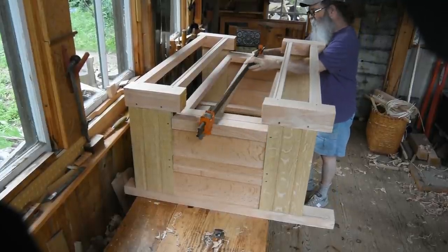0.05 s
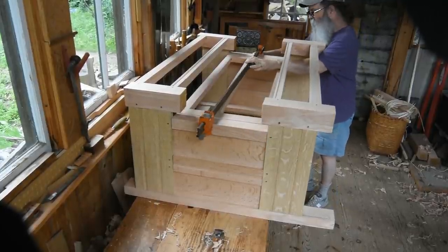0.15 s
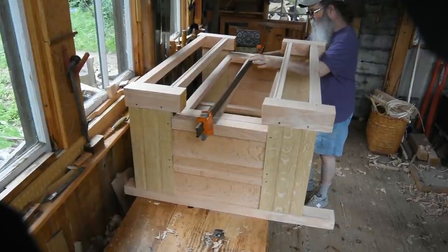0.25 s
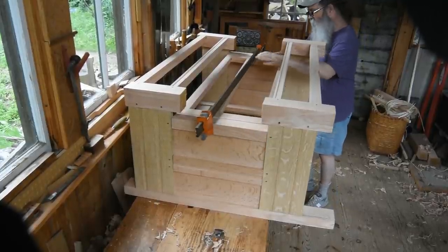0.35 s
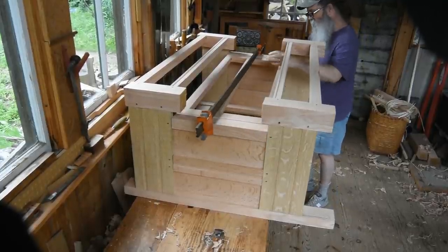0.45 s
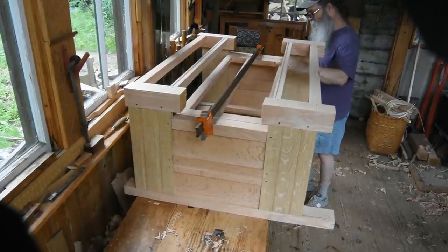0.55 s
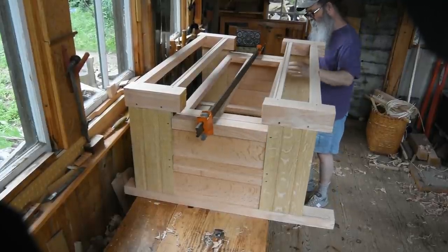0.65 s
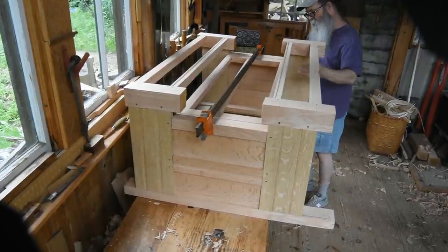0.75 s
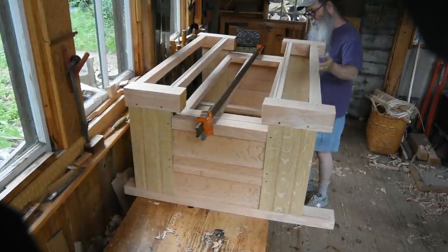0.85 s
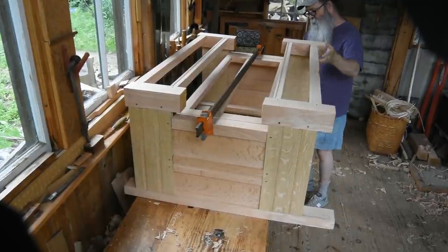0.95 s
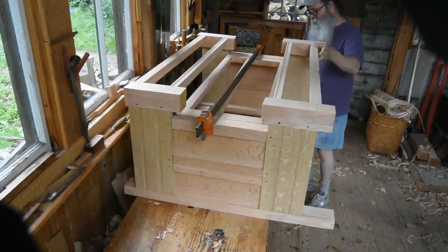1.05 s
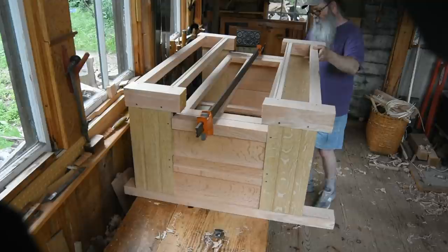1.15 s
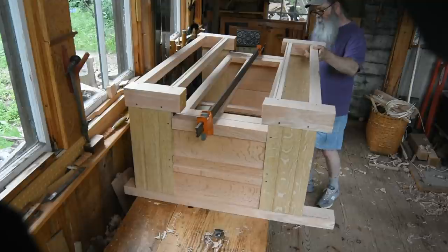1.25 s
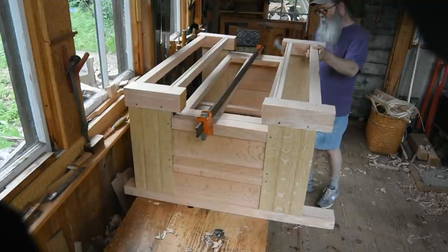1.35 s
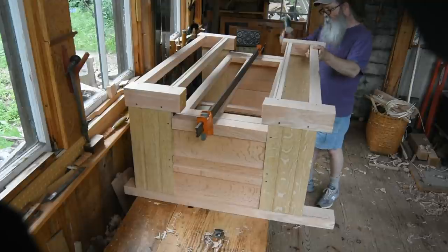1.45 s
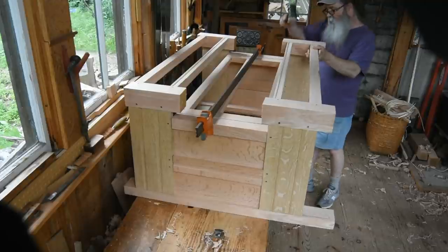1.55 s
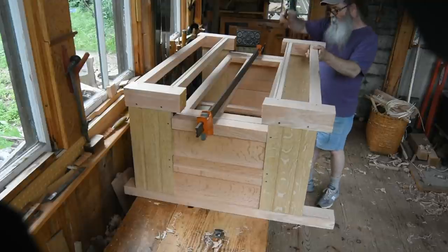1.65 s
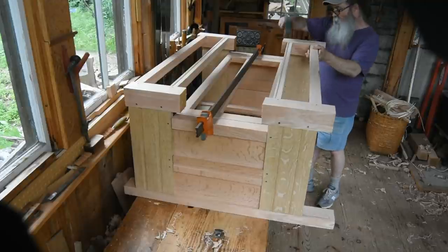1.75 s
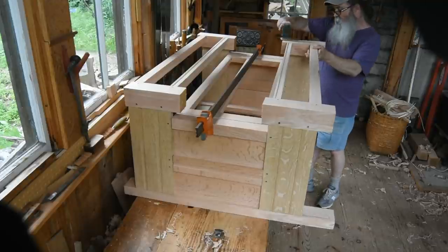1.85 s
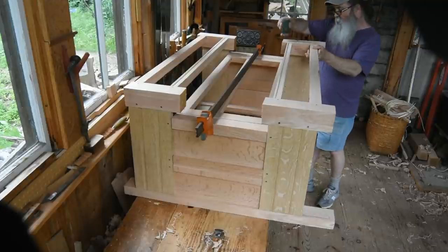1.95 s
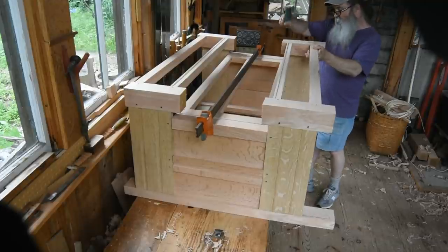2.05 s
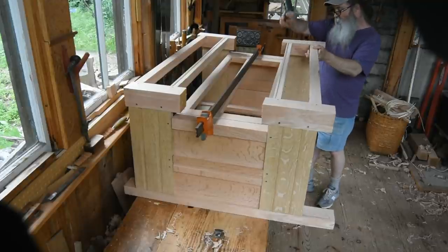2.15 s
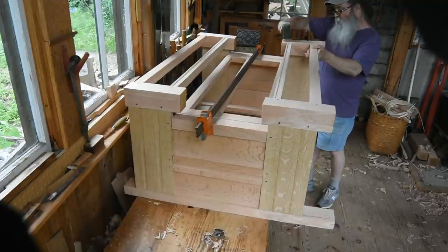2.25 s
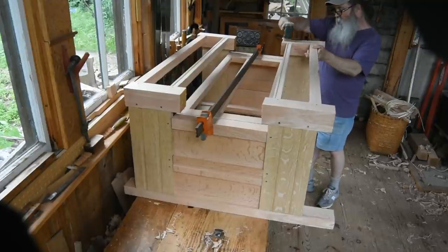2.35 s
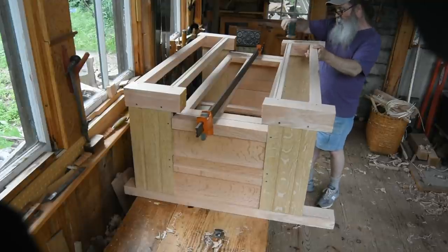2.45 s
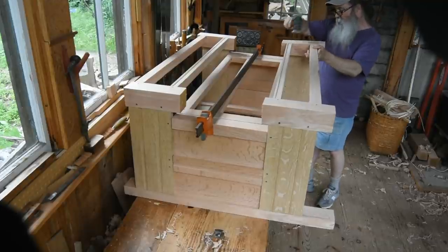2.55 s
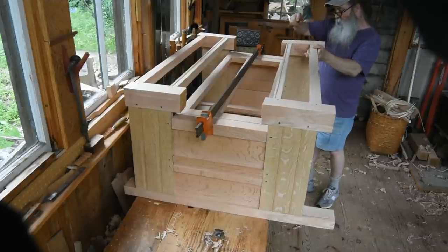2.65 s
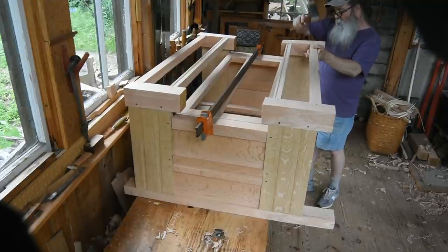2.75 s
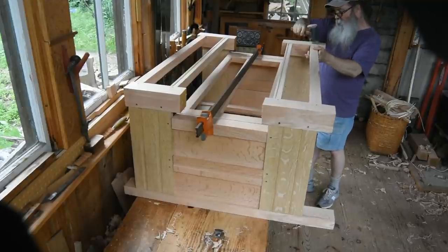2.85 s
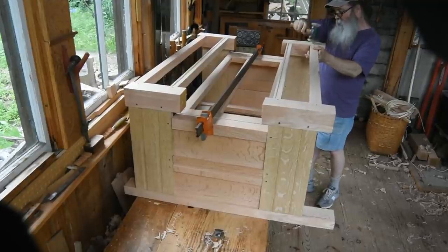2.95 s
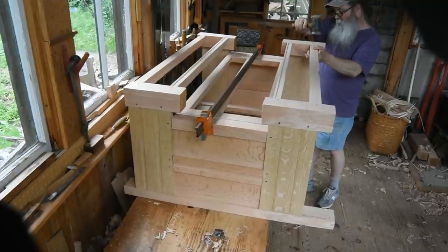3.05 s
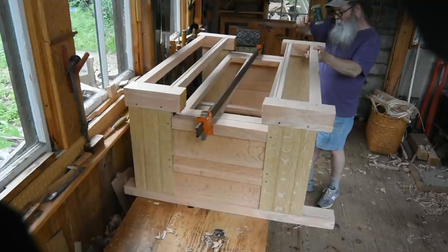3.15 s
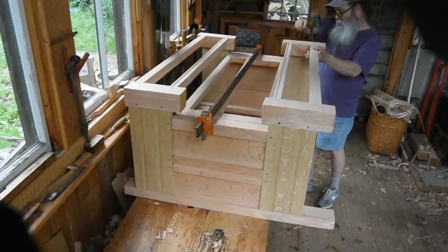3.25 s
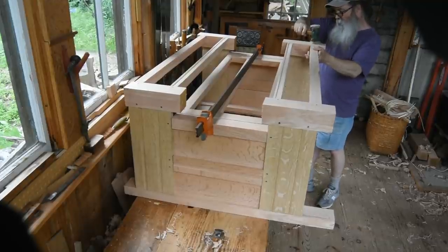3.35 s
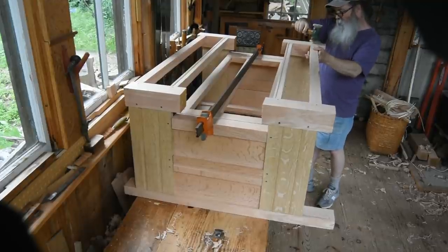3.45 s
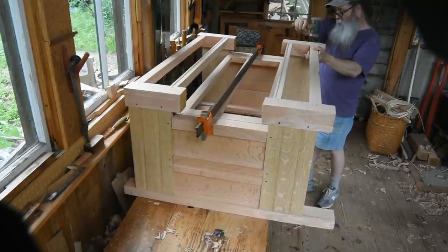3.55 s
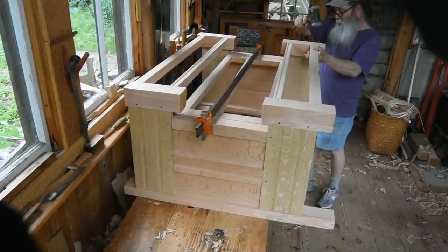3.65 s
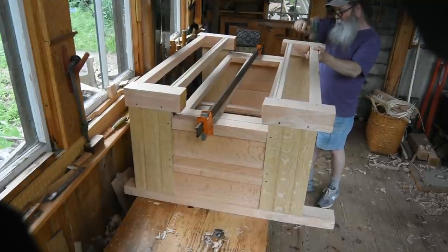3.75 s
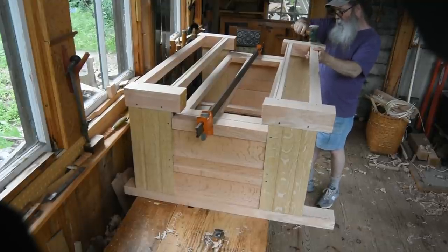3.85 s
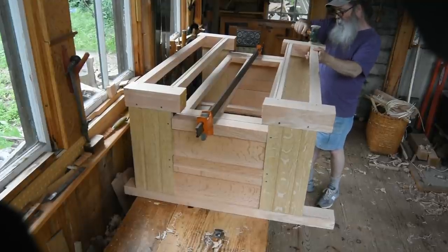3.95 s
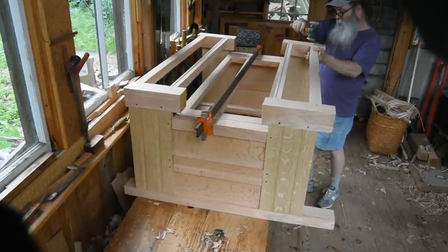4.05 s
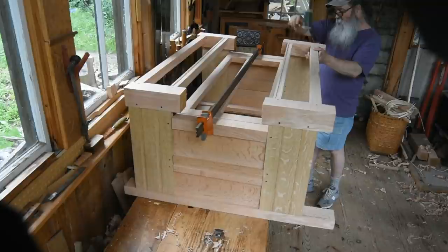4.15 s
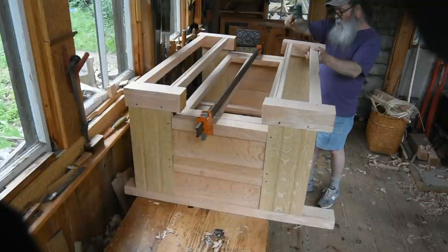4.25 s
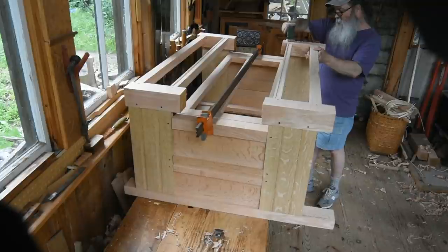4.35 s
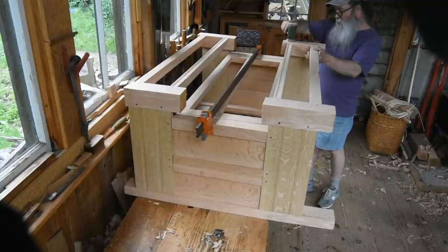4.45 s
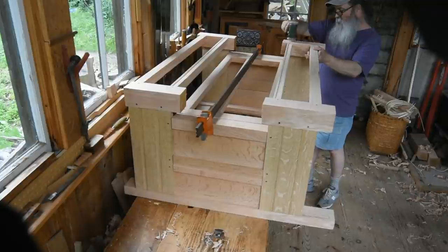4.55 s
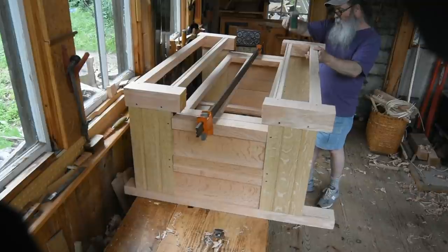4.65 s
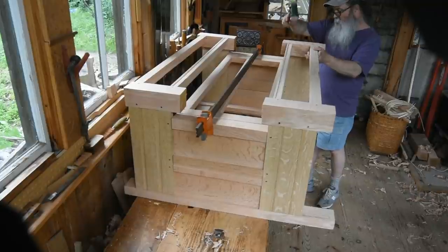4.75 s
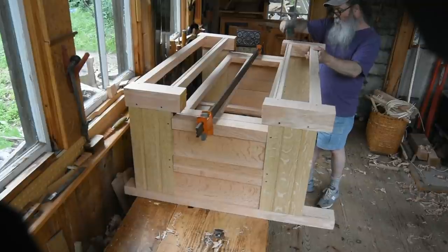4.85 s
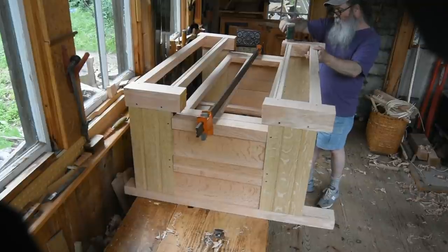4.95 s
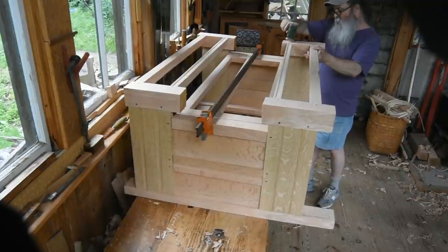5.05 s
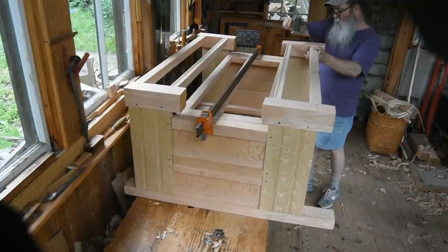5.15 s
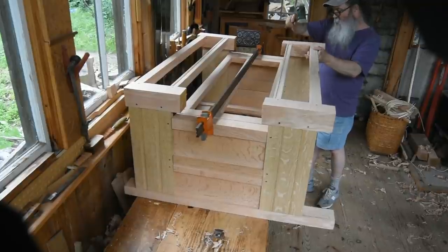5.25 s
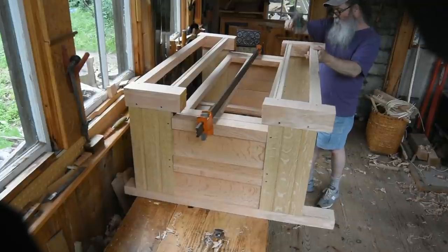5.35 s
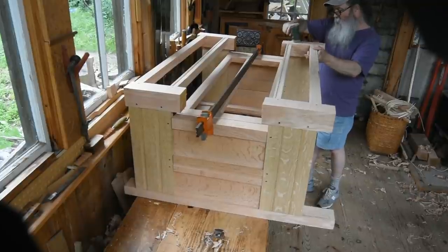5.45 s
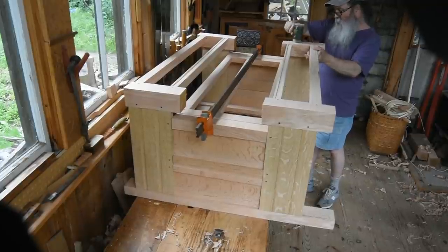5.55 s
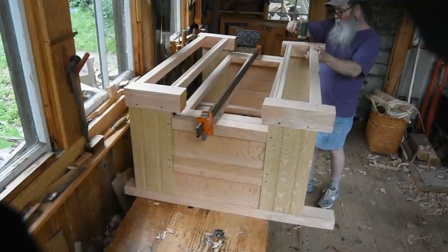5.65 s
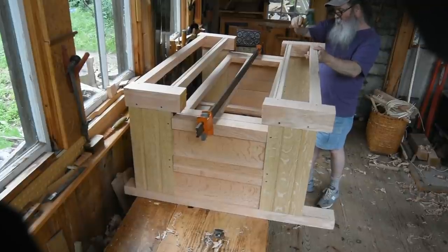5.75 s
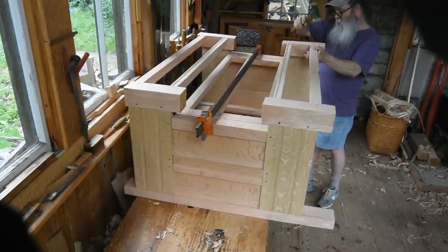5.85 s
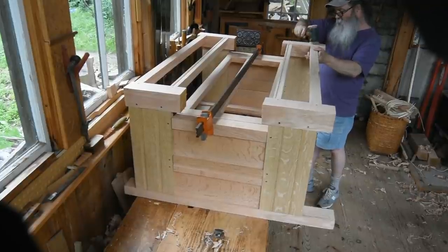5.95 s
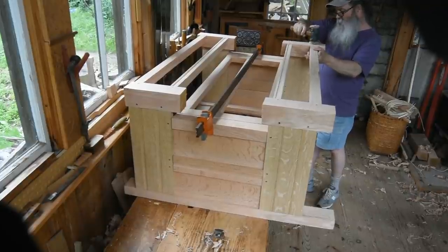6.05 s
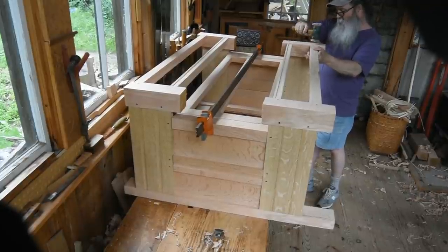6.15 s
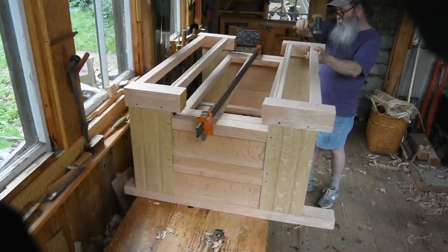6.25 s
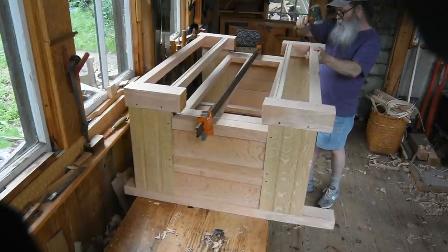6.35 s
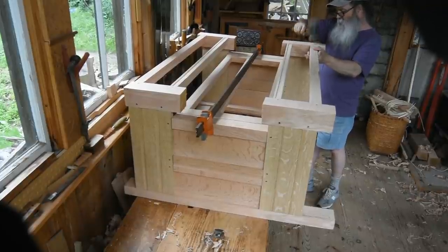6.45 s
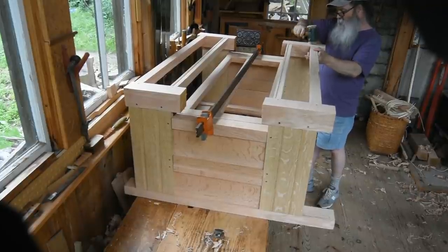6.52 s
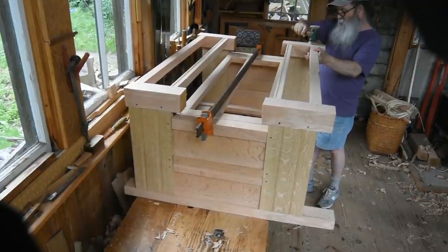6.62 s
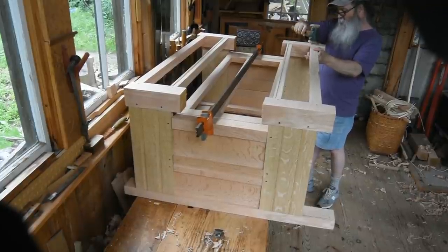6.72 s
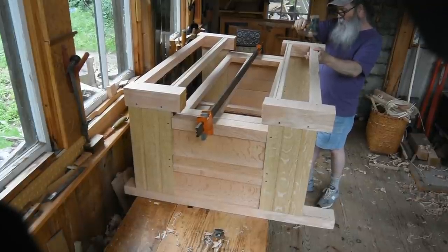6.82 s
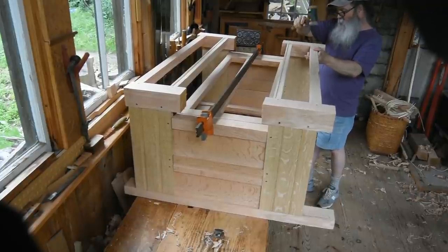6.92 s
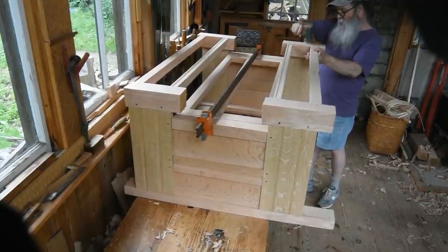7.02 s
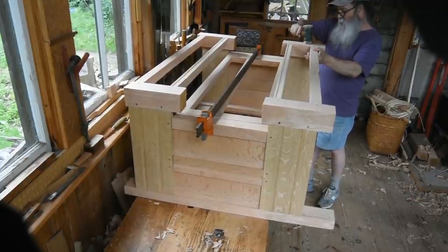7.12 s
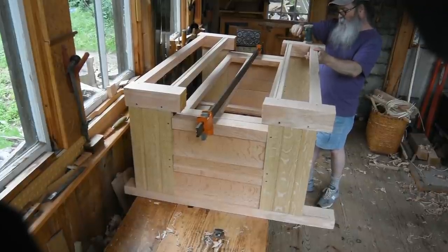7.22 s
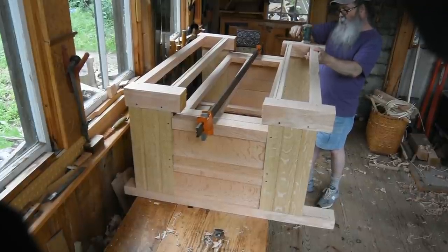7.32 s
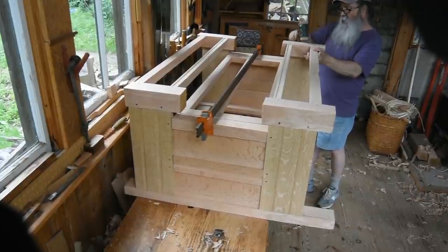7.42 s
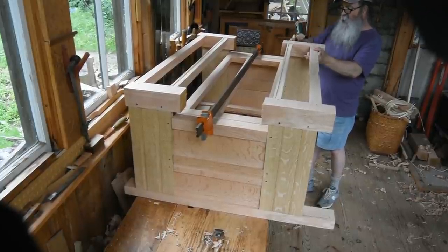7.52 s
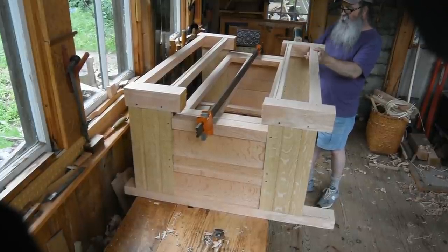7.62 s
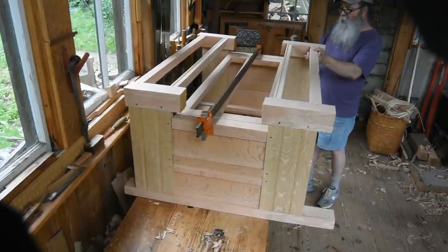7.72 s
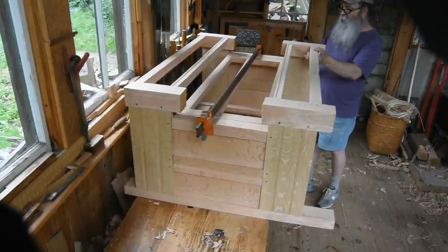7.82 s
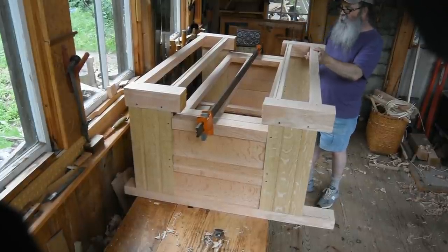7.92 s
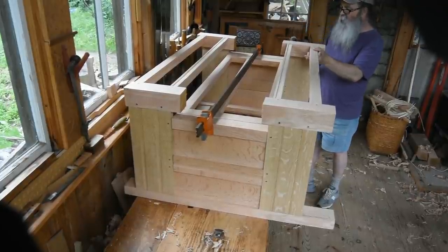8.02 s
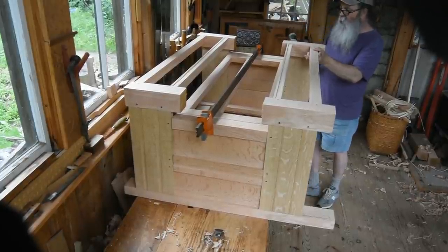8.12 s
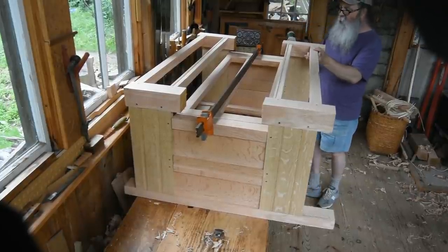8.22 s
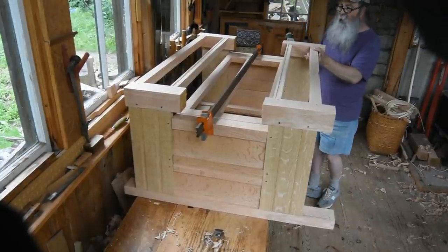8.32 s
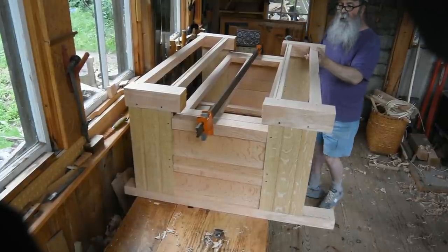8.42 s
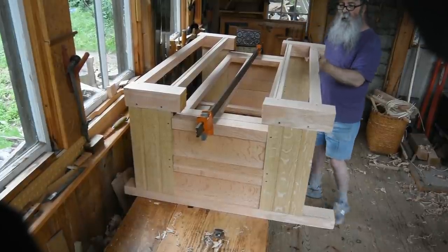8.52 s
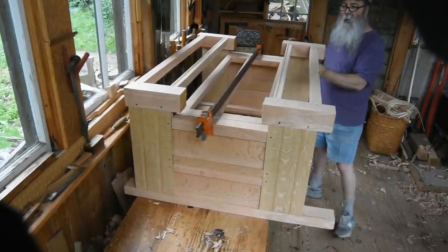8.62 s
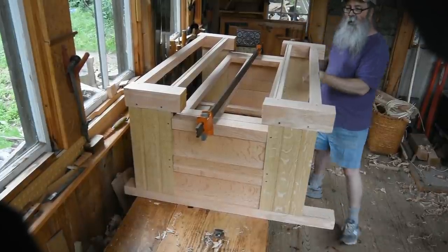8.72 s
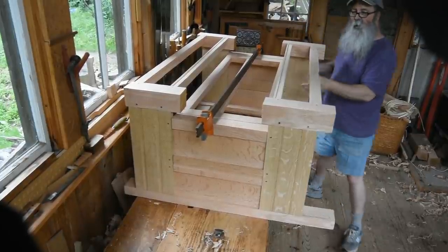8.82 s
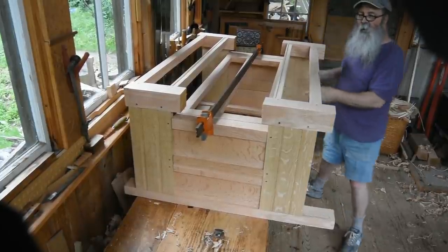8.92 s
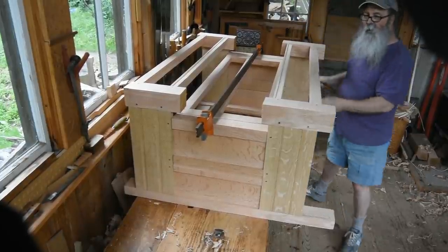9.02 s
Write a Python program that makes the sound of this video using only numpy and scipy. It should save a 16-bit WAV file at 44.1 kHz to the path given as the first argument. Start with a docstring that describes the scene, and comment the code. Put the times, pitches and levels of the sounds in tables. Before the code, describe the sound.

Eleven loud mallet blows close the joints of a wooden frame, regular and very sharp, with woody knock, hollow box thud and short room reflections. Before them, a little tapping and rubbing of wood; between them, tiny rattles of loose parts; after them, shuffling hands and shoes and one light tap. Small shop with a short reverberation, steady low rumble and soft hiss, peaks squashed and lightly clipped at the microphone.

```python
"""Small wooden workshop: a mallet drives the joints of a pine frame home in eleven blows.
Each blow is a filtered click, noise bursts and damped modes of boards and a steel clamp.
Around them parts tap (rattle noise and modes) and hands and shoes scuff (gritty noise).
The building rumbles and hisses (filtered noise) throughout.
A gain control takes off three quarters of each blow's excess, so the loudest cycles still clip."""
import sys
import numpy as np
from scipy import signal
from scipy.fft import rfft, irfft, next_fast_len
from scipy.io import wavfile
from scipy.ndimage import uniform_filter1d, map_coordinates

SR = 44100
rng = np.random.default_rng(int(sys.argv[2]) if len(sys.argv) > 2 else 0)


def pcm_store(signal):
    """Save signal as 16-bit PCM."""
    levels = np.round(np.clip(np.atleast_2d(signal), -1, 1) * 32767)
    wavfile.write(sys.argv[1], SR, levels.astype(np.int16).T)


N = 400428
EVENT_T_S = np.arange(SR * 6 // 10) / SR  # time axis of one contact
EVENT_N = len(EVENT_T_S)


def amp(db):
    """Decibels to gain."""
    return 10 ** (np.asarray(db) / 20)


def unit(x):
    """Scale to rms 1."""
    return x / np.sqrt(np.mean(x ** 2) + 1e-20)


def along(points, hz):
    """Interpolate (f/Hz, value) points on a log frequency axis."""
    f, value = np.transpose(points)
    return np.interp(np.log(hz + 1), np.log(f + 1), value)


def filtered(x, response):
    """Multiply the spectrum of x by a response of frequency."""
    n = x.shape[-1]
    padded_n = next_fast_len(n + 8192)
    f = np.fft.rfftfreq(padded_n, 1 / SR)
    return irfft(rfft(x, padded_n) * response(f), padded_n)[..., :n]


def wobble(knots_hz):
    """Smooth random curve through knots_hz normal draws a second."""
    knots = rng.standard_normal(int(N * knots_hz / SR) + 4)
    return map_coordinates(knots, [np.arange(N) * knots_hz / SR])


def decay(t60_s):
    """Exponential decay, -60 dB at t60_s."""
    return amp(-60 * EVENT_T_S / t60_s)


def soft_start(rise_s):
    """Gaussian-shaped onset from 0 to 1."""
    return 1 - np.exp(-(EVENT_T_S / rise_s) ** 2)


def ring(modes, scatter_db):
    """Damped modes of random strength and phase; a random phase drift blurs the lines and roughens the ring."""
    hz, db, t60_s = np.transpose(modes)[..., None]
    size = amp(db + scatter_db * rng.standard_normal(db.shape))
    steps = rng.standard_normal((len(hz), EVENT_N))
    drift = 0.0012 * np.sqrt(hz) * np.cumsum(steps, axis=1)
    phase = 2 * np.pi * (hz * EVENT_T_S + rng.random(db.shape)) + drift
    partials = size * decay(t60_s) * np.sin(phase)
    return partials.sum(axis=0) * soft_start(0.0022)


def puff(t60_s):
    """Decaying noise burst that starts within a millisecond or two."""
    return rng.standard_normal(EVENT_N) * decay(t60_s) * soft_start(0.0017)


def tone(body_db, edge_db):
    """Colour of a small contact: body near 900 Hz and edge near 9 kHz against the 3 kHz middle."""
    points = [(150, body_db - 5.5), (900, body_db), (2900, 0.014),
              (4200, 0.33 * edge_db), (9000, edge_db), (16000, 2.0 * edge_db)]
    return lambda f: amp(along(points, f))


# shop reverberation: f/Hz, t60/s
SHOP_DECAY = [(100, 0.46), (260, 0.25), (700, 0.26), (1840, 0.26), (4850, 0.23), (12800, 0.21)]
# stereo colour of the reflections: f/Hz, relative side level/dB
REFLECTION_WIDTH = [(60, -57), (150, -49.5), (380, -82), (950, -13.5), (2380, 0.5), (5980, 4),
                    (15000, 15.5)]


def in_shop(x, feed, wet_db):
    """Mid and side of x plus the shop's answer to feed; every frequency dies at its own speed."""
    noise = rng.standard_normal((2, EVENT_N))
    hz, t, bins = signal.stft(noise, SR, nperseg=512)
    fade = amp(-60 * t / along(SHOP_DECAY, hz)[:, None])
    tail = signal.istft(bins * fade, SR, nperseg=512)[1][:, :EVENT_N]
    tail = tail * (1 - np.exp(-EVENT_T_S / 0.0037))  # reflections thicken
    tail = tail / np.linalg.norm(tail[0])
    wet = signal.fftconvolve(feed[None], tail, axes=1)[:, :EVENT_N]
    mid, side = amp(wet_db) * wet
    side = amp(-13.5) * filtered(side, lambda f: amp(along(REFLECTION_WIDTH, f)))
    return np.array([x + mid, side])


def add(out, start_s, x):
    """Mix x into out at start_s."""
    part = out[:, round(start_s * SR):][:, :x.shape[1]]
    part += x[:, :part.shape[1]]


# room tone levels: t/s, rumble level/dB, hiss level/dB
ROOM_LEVELS = [(0, -32.5, -40.5), (.5, -31.5, -44.5), (1, -36, -44.5), (1.8, -35, -46), (3, -32, -46),
               (4.5, -33, -46), (6, -33, -45), (7.5, -34.5, -45), (8.3, -35.5, -44.5), (9.08, -37.5, -43.5)]
# rumble spectrum: f/Hz, relative level/dB
RUMBLE_SPECTRUM = [(9, 1.5), (16, -15), (30, 9), (40, -4.5), (52, 3.5), (67, 7.5), (82, 3), (105, -2),
                   (128, -8.5), (160, -6), (198, -5), (240, -16), (300, -19.5), (450, -23.5), (900, -91.5)]
# hiss spectrum: f/Hz, relative level/dB
HISS_SPECTRUM = [(150, -15.5), (250, 2), (324, -8), (406, -11), (649, -7), (684, -9), (872, -8),
                 (1210, -15), (5980, -32.5), (15800, -43.5)]
# room tone width: f/Hz, side minus mid/dB
ROOM_WIDTH = [(60, -72.5), (150, -68), (380, -34.5), (950, -19.5), (2380, -5), (5980, -0.5), (15000, 0)]


def room_tone():
    """Low rumble and softer hiss: filtered noise whose levels stir a little."""
    knot_s, rumble_db, hiss_db = np.transpose(ROOM_LEVELS)
    t = np.arange(N) / SR
    rumble_level_db = np.interp(t, knot_s, rumble_db) + 1.9 * wobble(12)
    hiss_level_db = np.interp(t, knot_s, hiss_db) + 0.6 * wobble(11)
    layers = 0
    for spectrum, db in [(RUMBLE_SPECTRUM, rumble_level_db), (HISS_SPECTRUM, hiss_level_db)]:
        noise = rng.standard_normal((2, N))
        pair = filtered(noise, lambda f: amp(along(spectrum, f) + [0 * f, along(ROOM_WIDTH, f)]))
        layers = layers + amp(db) * pair / np.std(pair[0])
    return layers


FIRM_DB, SOFTER_PER_DB = -30, 0.06  # strokes this loud start at once; weaker ones creep in
# hands and shoes rubbing wood: t/s, rise/s, fall/s (to -20 dB), level/dB, body/dB, edge/dB
SCUFF_STROKES = [(0.598, 0.038, 0.13, -49.5, 8, -12), (0.85, 0.04, 0.19, -47, 20, -10),
                 (1.06, 0.039, 0.064, -45.5, 7, -19), (1.268, .035, 0.039, -33.5, -5.5, -22.5),
                 (1.46, 0.037, 0.068, -59, -5, -8), (4.049, 0.017, 0.029, -52, -2, -16),
                 (7.601, 0.052, .06, -55, -12, -9), (7.991, 0.087, 0.023, -55, -3, -18),
                 (8.131, 0.052, 0.032, -34, 5.5, -12.5), (8.379, 0.084, 0.049, -45, 8, -15),
                 (8.9, 0.022, 0.065, -39, 6, -17), (9.04, 0.038, 0.023, -38.5, 6.5, -21)]


def scuffs():
    """Gritty friction noise under a stroke that stutters, swells and fades."""
    out = np.zeros((2, N))
    t = EVENT_T_S
    for start_s, rise_s, fall_s, db, body_db, edge_db in SCUFF_STROKES:
        softness = max(SOFTER_PER_DB * (FIRM_DB - db), 0)
        grit = rng.standard_normal(EVENT_N) * amp(4.3 * rng.standard_normal(EVENT_N))
        stutter = amp(4 * map_coordinates(rng.standard_normal(100), [t * 150]))  # 150 knots/s
        swell = np.minimum(t / rise_s, 1) ** softness
        stroke = np.where(t < rise_s, swell, amp(-20 * (t - rise_s) / fall_s))
        rub = stroke * stutter * unit(filtered(grit, tone(body_db, edge_db)))
        add(out, start_s, amp(db) * in_shop(rub, rub, wet_db=0.2))
    return out


TAP_EDGE_DB, TAP_CLAMP_DB = -29.5, -49  # treble edge and clamp ring of every tap
# small parts touching: t/s, level/dB, body/dB, rattle t60/s, thud/dB, batten ring/dB
TAP_CONTACTS = [(0.097, -33, -5, 0.024, -27, -12), (0.162, -22, 3, 0.03, 11.5, -8),
                (.524, -33.5, 14, 0.087, -22, -13), (0.63, -38, 15, .06, -21, -29),
                (3.208, -32, 39, .08, -18, -31), (4.157, -27.5, 8, 0.051, -27, -5.5),
                (6.328, -31, 9.5, 0.12, -18, -22), (6.748, -29, 11, 0.031, -18, -15.5),
                (6.987, -32.5, 19, 0.057, -21, -32), (7.401, -34.5, 13, 0.045, -26, -34),
                (8.468, -44, -11, 0.033, -51, -30), (8.928, -24, 8.5, 0.024, -23, -36)]
# loose batten: f/Hz, level/dB, t60/s
BATTEN_MODES = [(711, 0, .22), (937, -3, .1), (1147, -7, .08), (1820, -5, .09), (2099, -7, .07),
                (2428, -6, .12), (3106, -6, .06)]
# boards and box, also rung by the mallet: f/Hz, level/dB, t60/s
FRAME_MODES = [(67.8, -18.5, 0.21), (154.6, -14.5, 0.15), (199, -11.5, 0.13), (316.1, -18, 0.2),
               (370, -17, 0.069), (575, -4.5, 0.021), (724, -9.5, 0.073), (840, 1.5, 0.015),
               (946, -23, 0.055), (1224, -25, 0.031), (1254, -7.5, 0.006), (1422, -0.5, 0.02),
               (1519, -15, 0.12), (1682, -1, 0.019), (1771, -7.5, 0.034), (1963, -9.5, 0.019),
               (2064, -22.5, 0.077), (2280, -14, 0.042), (2420, -23.5, 0.054)]
# steel bar clamp, also rung by the mallet: f/Hz, level/dB, t60/s
CLAMP_MODES = [(5010, -9, .1), (7300, -10, .1), (8740, -11, .15), (9870, -9, .18), (11720, -8, .16)]


def taps():
    """Light contacts: a short noise rattle, the batten's modes, a thud in the frame, a trace of clamp."""
    out = np.zeros((2, N))
    for start_s, db, body_db, rattle_s, thud_db, batten_db in TAP_CONTACTS:
        rattle = filtered(puff(rattle_s), tone(body_db, TAP_EDGE_DB))
        batten = ring(BATTEN_MODES, scatter_db=2)
        steel = ring(CLAMP_MODES, scatter_db=3)
        thud = ring(FRAME_MODES[1:3], scatter_db=1)  # the box's two hollow modes
        tap = rattle / np.abs(rattle).max()
        tap = tap + amp(batten_db) * batten + amp(thud_db) * thud + amp(TAP_CLAMP_DB) * steel
        add(out, start_s, amp(db) * in_shop(tap, tap, wet_db=4.5))
    return out


THUD_DB = 21.5  # the box thuds alike however hard the blow
CLACK_DB, CLACK_SHARE = -3, 0.32  # clack against the knock; its share of the hardness
# mallet blows: t/s, strength/dB, hardness/dB, clamp ring/dB, knock f/Hz
MALLET_BLOWS = [(1.837, 26, 0.5, -19.5, 540), (2.317, 23.5, 5, -14, 673), (2.862, 30.5, -0.5, -24, 619),
                (3.329, 31, -4, -21, 796), (3.809, 28.5, -2.3, -40, 715), (4.366, 30.5, 1, -15, 729),
                (4.9, 26, 4, -13, 667), (5.422, 31, 1.5, -15, 673), (5.977, 30, 3, -27, 640),
                (6.506, 30.5, 0.5, -21, 721), (7.064, 32, -0.6, -20, 730)]
# centres of thud, knock, clack and crack: f/Hz
BLOW_PARTS_HZ = [220, 700, 1550, 5000]
# contact colour: f/Hz, relative level/dB
CONTACT_COLOUR = [(47, -37.5), (80, -28.5), (212, 3), (430, -8.5), (699, -5), (853, -8), (1520, -6.5),
                  (2520, -21.5), (7450, -33), (15800, -59.5)]


def mallet():
    """Blow: a click that fills the shop, a snap, a chatter of the joint, frame modes and clamp ring."""
    out = np.zeros((2, N))
    click = np.arange(EVENT_N) == 88  # at 2 ms
    for start_s, db, hard_db, clamp_db, knock_hz in MALLET_BLOWS:
        clack_db = db + CLACK_DB + CLACK_SHARE * hard_db
        parts_db = [THUD_DB, db, clack_db, db + hard_db]  # a harder contact is brighter
        strength = list(zip(BLOW_PARTS_HZ, parts_db))
        colour = lambda f: amp(along(CONTACT_COLOUR, f) + along(strength, f))

        boards = ring(FRAME_MODES, scatter_db=2)
        knock = ring([(knock_hz, -3, 0.035)], scatter_db=0)
        wood = amp(-8.5) * filtered(boards + knock, lambda f: amp(along(strength, f)))
        steel = ring(CLAMP_MODES, scatter_db=3)
        rings = wood + amp(clamp_db) * steel

        snap = amp(26.5) * filtered(puff(0.012), lambda f: colour(f) * f / (f + 5000))
        snap = np.roll(snap, 90)  # the joint slams shut 2 ms after the face lands
        chatter = amp(6.0) * filtered(puff(0.029), colour)
        direct = soft_start(0.0016) * (snap + chatter + rings)
        feed = amp(32.0) * filtered(click, colour) + rings
        add(out, start_s, in_shop(direct, feed, wet_db=-3))
    return out


# stereo balance: f/Hz, left minus right/dB
BALANCE = [(500, 0), (1200, -.8), (8000, -.7), (14000, -1.6)]


def scene():
    """Sum all sources; mid and side to left and right."""
    mid, side = room_tone() + scuffs() + taps() + mallet()
    pair = np.array([mid + side, mid - side])
    return filtered(pair, lambda f: amp(along(BALANCE, f) * [[0.5], [-0.5]]))


TOP_HZ = 15950  # band limit


def record(dry):
    """Gain control takes off three quarters of the excess, so the loudest cycles still clip; band limit."""
    over_db = 20 * np.log10(np.abs(dry).max(axis=0) + 1e-9) + 3  # above -3 dB of full scale
    need_db = -np.maximum(0.75 * over_db, 0)
    climb_db = 55 * np.arange(N) / SR  # recovery, 55 dB/s
    gain_db = np.minimum(climb_db + np.minimum.accumulate(need_db - climb_db), 0)
    smoothing_n = int(0.0015 * SR)
    x = dry * amp(uniform_filter1d(gain_db, smoothing_n))
    x = x / (1 + np.abs(x) ** 12) ** (1 / 12)  # rounded clipping
    return np.clip(filtered(x, lambda f: f < TOP_HZ), -1, 1)


dry = scene()
out = record(dry)
pcm_store(out)
```